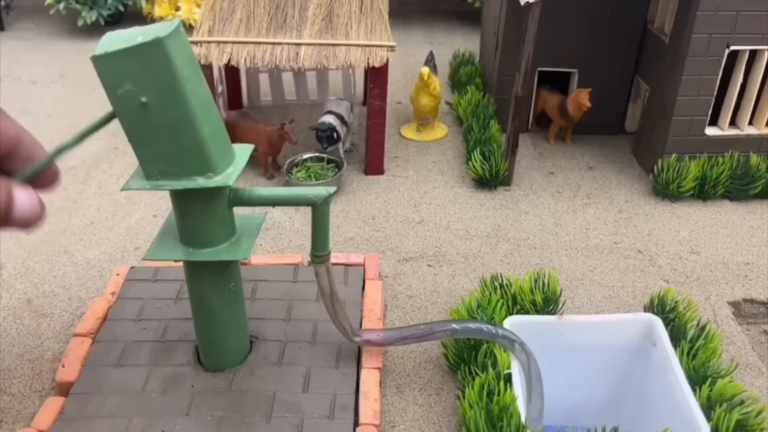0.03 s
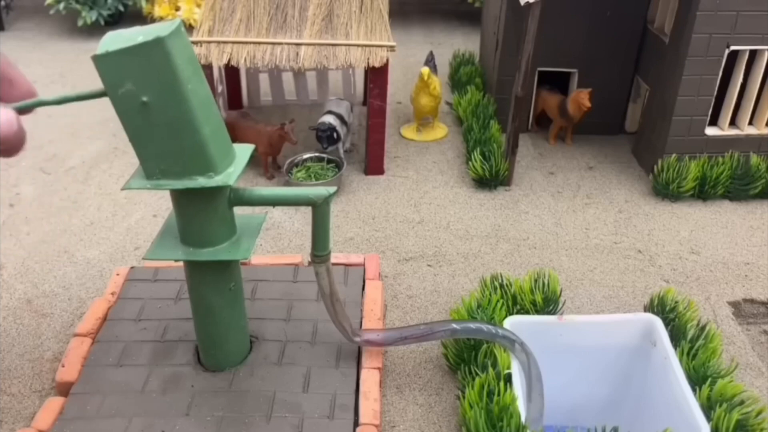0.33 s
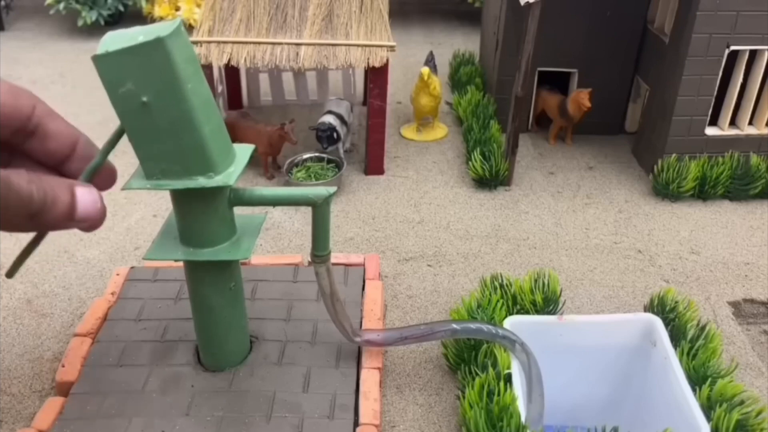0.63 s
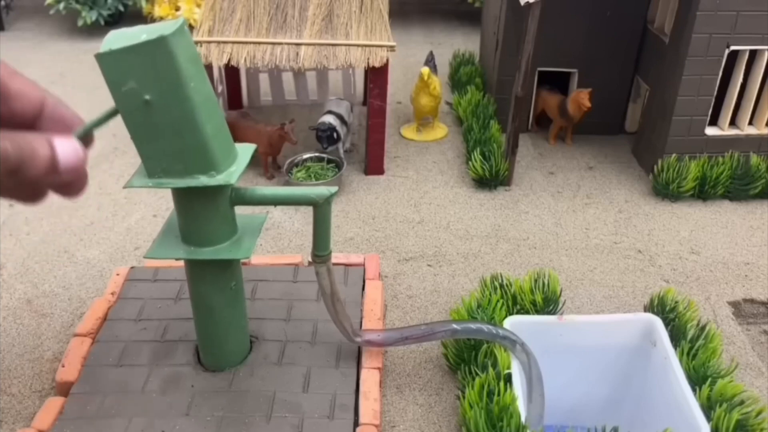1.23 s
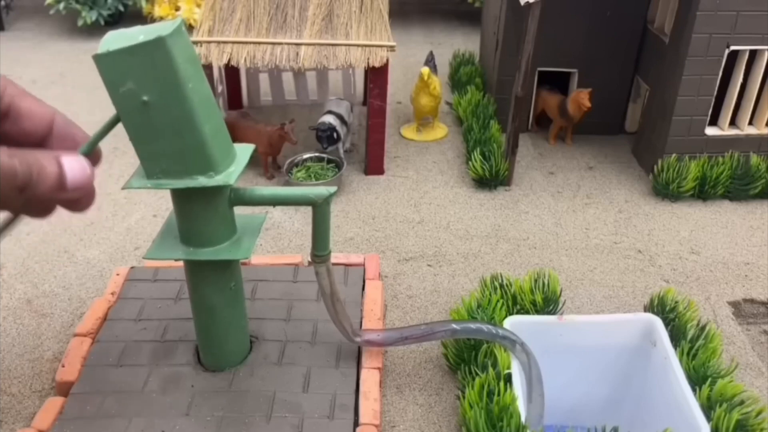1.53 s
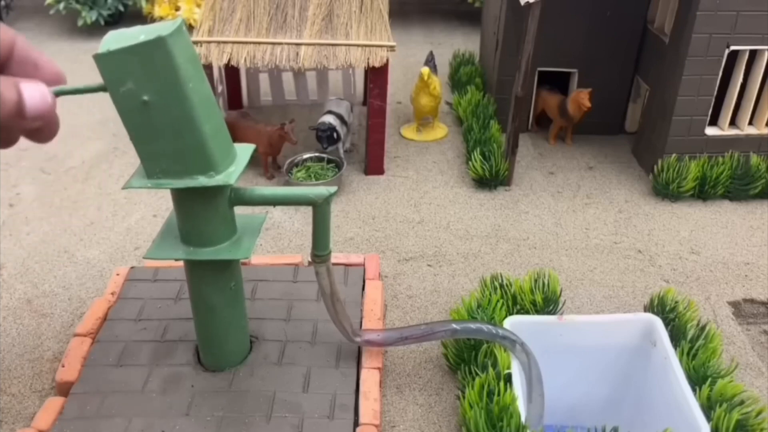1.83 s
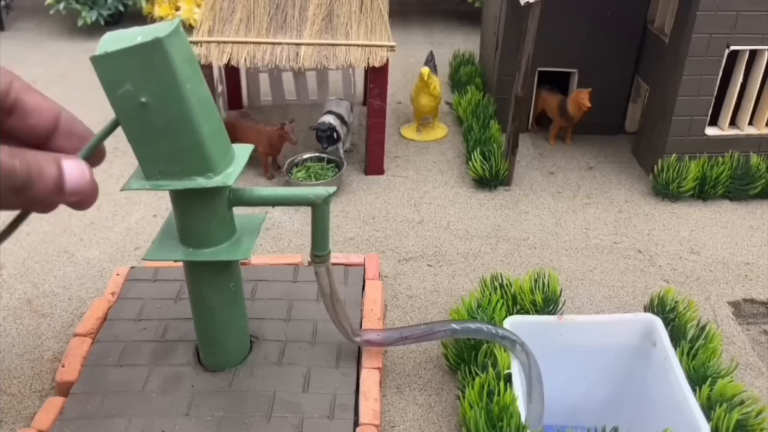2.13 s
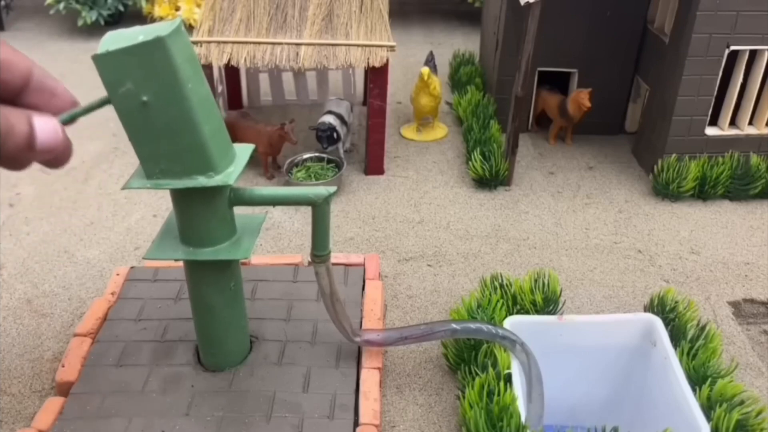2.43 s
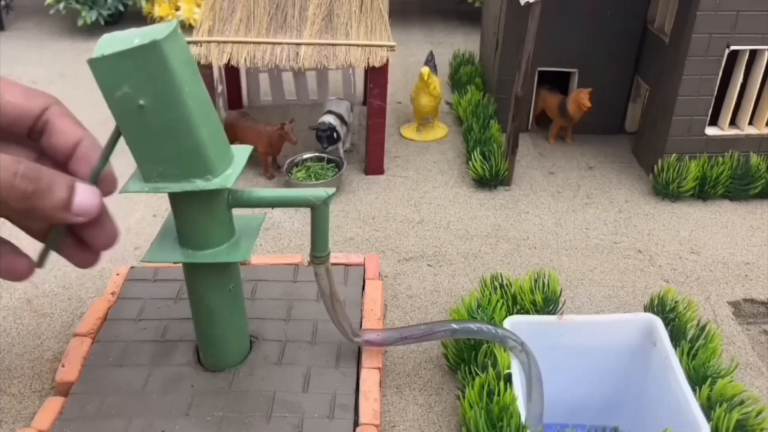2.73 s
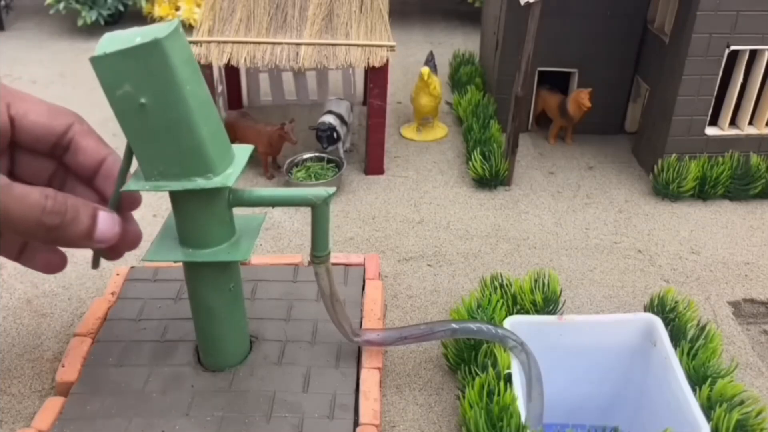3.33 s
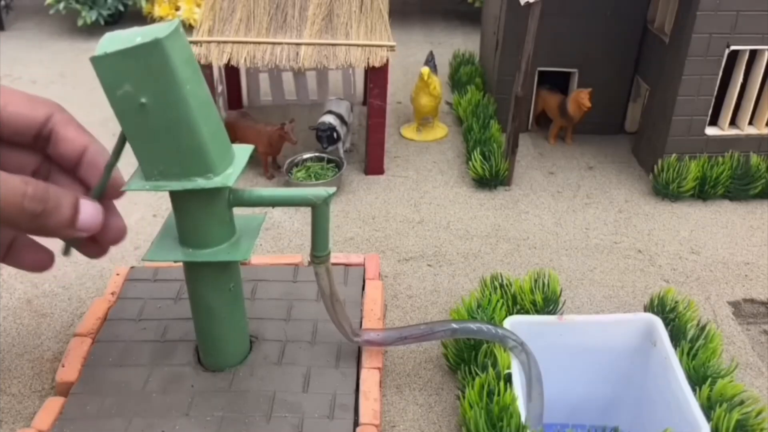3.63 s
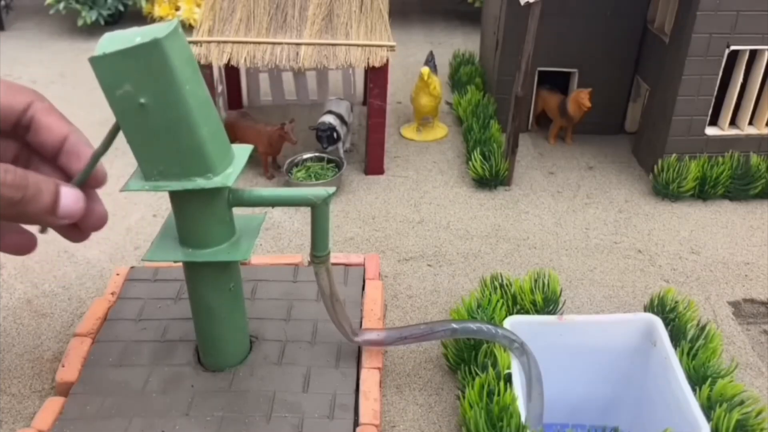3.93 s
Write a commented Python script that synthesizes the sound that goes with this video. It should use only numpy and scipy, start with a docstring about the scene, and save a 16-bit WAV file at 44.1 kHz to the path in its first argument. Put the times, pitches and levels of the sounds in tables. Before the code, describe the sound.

A miniature hand pump is worked close by in a small quiet room for about four seconds. Its loose metal lever clacks unevenly and rings briefly, while the plunger rubs, scrapes and knocks in the hollow barrel and the wet seal faintly groans and squeaks. Dull thumps come near 0.7 and 2 seconds. From about 2.6 to 3.8 seconds, a bird further off whistles quick, gliding, echoing notes.

```python
"""A miniature water pump is worked by its wire lever, close by in a small quiet room.
The loose metal linkage clacks and leaves the lever ringing. The plunger rubs, scrapes and
knocks in the hollow barrel, its wet seal groans and chirps, and there are a few dull thumps.
During the last strokes a bird whistles from further off."""
import sys
import numpy as np
from scipy import signal
from scipy.fft import rfft, irfft
from scipy.io import wavfile

SR = 44100
rng = np.random.default_rng(int(sys.argv[2]) if len(sys.argv) > 2 else 0)


def master(y):
    """Save y as 16-bit WAV."""
    cut = np.clip(np.atleast_2d(y).T, -1, 1)
    pcm = np.round(cut * 32767)  # scale
    wavfile.write(sys.argv[1], SR, pcm.astype(np.int16))


N = 176400
T = np.arange(N) / SR

# The tones at which the lever rings: pitch_hz, level_db, fade_s (time to fall by 60 dB)
LEVER_TONES = [(1209, -12, 0.029), (1840, 1, 0.085), (2806, -10.5, 0.059), (3158, -19, 0.22),
               (3740, 9, 0.14), (3967, -6.5, 0.24), (4473, 4.5, 0.14), (5090, 6, .22), (5173, -6.5, 0.089),
               (5860, 1.5, 0.21), (6690, 2.5, 0.16), (6990, -12.5, 0.18), (7560, -1.5, .14),
               (7940, -10.5, 0.13), (8280, -1, 0.072), (8700, -7.5, 0.045), (9270, -8.5, 0.036),
               (9900, -17, 0.051), (10630, -11, 0.12), (11450, -15.5, 0.13), (12600, -17.5, .09)]
# The tones of the hollow barrel: pitch_hz, width_hz, level_db
BARREL_TONES = [(187.7, 41, 3), (299, 15, -11.5), (486.2, 58, -2), (696.5, 6, -2)]


def from_db(db):
    """Turn decibels into a number to multiply by."""
    return 10 ** (np.asarray(db) / 20)


def unit_power(x):
    """Scale a sound to an average power of 1."""
    return x / np.sqrt(np.mean(x ** 2) + 1e-20)


def colour(x, points, tilt_db=0, tilt_from_hz=2530):
    """Shape a sound by (pitch_hz, level_db) points and tilt its treble by tilt_db per octave."""
    octave = np.log2(np.maximum(np.arange(len(x) // 2 + 1) * SR / len(x), 1))
    hz, db = np.transpose(points)
    tilt = tilt_db * np.maximum(octave - np.log2(tilt_from_hz), 0)
    gain = from_db(np.interp(octave, np.log2(hz), db) + tilt)
    return unit_power(irfft(rfft(x) * gain, len(x)))


def drift(hz):
    """A smooth random wobble of typical size 1, mostly slower than hz."""
    r = np.exp(-2 * np.pi * hz / SR)
    return unit_power(signal.lfilter([1], [1, -2 * r, r * r], rng.standard_normal(N + SR))[SR:])


def level_curve(times, db):
    """Loudness that follows the given points and fades quickly outside them."""
    outside_s = np.maximum(np.maximum(times[0] - T, T - times[-1]), 0)
    return from_db(np.interp(T, times, db) - np.minimum(outside_s * 3000, 200))


def hit_shape(t, rise_s, fade_s):
    """The loudness of a hit: a quick rise, then a fall of 60 dB every fade_s."""
    rise_s = max(rise_s, 1e-4)
    return np.minimum(t / rise_s, 1) * from_db(-60 * np.maximum(t - rise_s, 0) / fade_s)


def sine(hz, t):
    """A pure tone that starts anywhere in its cycle."""
    return np.sin(2 * np.pi * (hz * t + rng.random()))


def add(out, start_s, x):
    """Mix a sound in at the given time."""
    i = int(start_s * SR)
    out[i:i + len(x)] += x[:N - i]


def background():
    """The quiet room: a faint, steady, mostly low noise."""
    # Low and high parts of the noise: pitch_hz, level_db
    noise_colour = [(15, -16), (25, -55.5), (55, -17.5), (91, 6), (249, 2.5), (427, -7), (714, -5),
                    (1230, -19), (1330, -8.5), (1650, -18.5), (4030, -27), (13200, -28.5), (16000, -49)]
    return from_db(-58) * colour(rng.standard_normal(N), noise_colour)


def echoes(x, fade_s, treble_fade_s=0.35, treble_from_hz=2900):
    """Many reflections blur into a tail whose treble fades at its own rate."""
    t = T[:SR // 2]
    reflections = rng.standard_normal(len(t)) * (t > 0.00055)
    low = signal.sosfiltfilt(signal.butter(2, treble_from_hz, fs=SR, output="sos"), reflections)
    fade = from_db(-60 * t / fade_s)
    tail = low * fade + (reflections - low) * from_db(-60 * t / treble_fade_s)
    return signal.fftconvolve(x, tail / np.sqrt(np.sum(fade ** 2)))[:N]


def bird():
    """A bird further off: pure gliding whistles with a long echo behind them."""
    # One list of points per whistle or lingering echo of a whistle: time_s, pitch_hz, level_db
    glides = [
        [(2.24, 7630, -66), (2.29, 7750, -47), (2.308, 7580, -47), (2.325, 7720, -55), (2.36, 7430, -50.5),
         (2.39, 7900, -66)],
        [(2.63, 6300, -45), (2.648, 5700, -40), (2.654, 6160, -35), (2.66, 5665, -39), (2.668, 5300, -31),
         (2.68, 4876, -25.5), (2.698, 4464, -21.5), (2.704, 4110, -19.5), (2.712, 4743, -42),
         (2.722, 4225, -19.5), (2.746, 4300, -17.5), (2.756, 4290, -30), (2.768, 3480, -23.5),
         (2.785, 3060, -22.5), (2.80, 3290, -43)],
        [(2.81, 3360, -36), (2.84, 3370, -30.5), (2.88, 3286, -36), (2.92, 3340, -35), (2.96, 3190, -37),
         (3.01, 3140, -48), (3.04, 3110, -64)],
        [(3.143, 3000, -46), (3.153, 3160, -25), (3.16, 3706, -20.5), (3.169, 4240, -18.5), (3.178, 4490, -15),
         (3.192, 4524, -16), (3.2, 3930, -21), (3.205, 3200, -23.5), (3.212, 3100, -48)],
        [(3.21, 4400, -25.5), (3.221, 4520, -26), (3.23, 4210, -61), (3.29, 4300, -32)],
        [(3.303, 3140, -23.5), (3.311, 3300, -26.5), (3.329, 3416, -26.5), (3.335, 3165, -15),
         (3.348, 3017, -27), (3.358, 3266, -21.5), (3.375, 3288, -31), (3.425, 3096, -46), (3.455, 3310, -25.5),
         (3.478, 3200, -43), (3.493, 3218, -21), (3.508, 3210, -26.5), (3.52, 3300, -53)],
        [(3.575, 2970, -43), (3.586, 3210, -22.5), (3.598, 3900, -16.5), (3.608, 4280, -17), (3.618, 4390, -15),
         (3.627, 4390, -20), (3.633, 3360, -23), (3.64, 3050, -45)],
        [(3.72, 4050, -46), (3.742, 4220, -26.5), (3.754, 4200, -42), (3.77, 4285, -21), (3.792, 4076, -33),
         (3.81, 3860, -40), (3.85, 3780, -39)],
    ]
    out, waver_hz = 0, 40 * drift(hz=90)
    for glide in glides:
        times, hz, db = np.transpose(glide)
        phase = 2 * np.pi * np.cumsum(np.interp(T, times, hz) + waver_hz) / SR
        out = out + level_curve(times, db) * np.sin(phase)
    return out + from_db(0.5) * echoes(out, fade_s=0.8)


def thumps():
    """Dull thumps that do not ring."""
    # Short low pulses: peak_s, half_length_s, pitch_hz, level_db
    pulses = [(0.708, .005, 220, -26), (0.7238, .0025, 330, -19), (1.956, .011, 38, -29)]
    out = np.zeros(N)
    for peak_s, half_length_s, hz, db in pulses:
        t = T - peak_s
        out -= from_db(db) * np.cos(2 * np.pi * hz * t) * np.exp(-(t / half_length_s) ** 2)
    return out


def seal():
    """The wet seal groans and chirps: short unsteady tones that swell and fade."""
    # The seal's tones: peak_s, glide_s, start_hz, end_hz, level_db, overtone_db_per_octave
    chirps = [(0.213, 0.046, 285.5, 287, -35, -9.5), (0.584, 0.087, 392, 337, -37, -18.5),
              (0.649, 0.079, 1610, 1440, -43.5, -18), (1.009, .04, 921, 783, -40.5, -5),
              (1.175, 0.032, 1186, 1187, -44, -2.5), (1.193, .024, 911, 945, -31, -0.5),
              (1.312, 0.11, 198.4, 176, -35.5, -30), (1.402, 0.041, 187.5, 187, -31, -21),
              (1.463, 0.079, 196.5, 187.4, -36.5, -9), (1.61, 0.2, 209.7, 200.7, -43.5, -16),
              (1.7, 0.034, 491, 544, -35, -11.5), (1.945, 0.077, 474.5, 529, -37.5, -41),
              (2.307, 0.079, 410.4, 438, -34.5, -18.5), (2.347, 0.051, 480, 568, -32, -13.5),
              (2.599, .14, 304.4, 235, -36.5, -31), (2.837, 0.066, 248.6, 248, -37, -8),
              (2.953, 0.047, 1150, 1014, -28.5, -5), (3.006, 0.014, 1022, 797, -28.5, -2),
              (3.13, 0.06, 203, 207.5, -28, -10), (3.26, 0.12, 193, 178.4, -44.5, -1)]
    out, harmonics = np.zeros(N), np.arange(1, 5)[:, None]
    waver = 1 + .055 * drift(hz=124)
    flutter = from_db(2 * drift(hz=124))
    for peak_s, glide_s, start_hz, end_hz, db, overtone_db in chirps:
        near = np.abs(T - peak_s) < glide_s
        position = (T[near] - peak_s) / glide_s  # -1 to 1, loudest at 0
        hz = np.interp(position, [-.5, .5], [start_hz, end_hz]) * waver[near]
        phase = 2 * np.pi * np.cumsum(hz) / SR
        waves = np.sin(harmonics * phase + 2 * np.pi * rng.random(harmonics.shape))
        tone = np.sum(from_db(overtone_db * np.log2(harmonics)) * waves, axis=0)
        out[near] += from_db(db) * unit_power(tone) * np.cos(np.pi * position / 2) ** 4
    return out * flutter


def slips(per_second, spread_db):
    """Rubbing surfaces stick and slip, making tiny uneven clicks that come in judders."""
    size_db = spread_db * np.minimum(rng.exponential(1, N), 3)
    judder_db = 3.5 * drift(hz=27.8)
    return from_db(size_db + judder_db) * rng.choice([-1, 1], N) * (rng.random(N) < per_second / SR)


def barrel(x):
    """The barrel turns a sound into hollow ringing plus a dull rub."""
    # Low and high parts of the rub: pitch_hz, level_db
    rub_colour = [(40, -39.5), (90, -0.5), (160, 3), (300, 8.5), (600, 4), (900, -5.5), (1600, -6),
                  (4000, -83.5)]
    hollow = 0
    for hz, width_hz, db in BARREL_TONES:
        r = np.exp(-np.pi * width_hz / SR)
        ring = signal.lfilter([1, 0, -1], [1, -2 * r * np.cos(2 * np.pi * hz / SR), r * r], x)
        hollow = hollow + from_db(db) * unit_power(ring)
    return from_db(-13) * unit_power(hollow) + from_db(-7.5) * colour(x, rub_colour)


def lever_body(x, half_width_hz=45, valley_gain=.3):
    """The lever favours pitches near its own tones, which makes a sound metallic."""
    hz = np.arange(len(x) // 2 + 1) * SR / len(x)
    peaks = sum(1 / (1 + ((hz - tone_hz) / half_width_hz) ** 2) for tone_hz, _, _ in LEVER_TONES)
    return irfft(rfft(x) * np.hypot(valley_gain, peaks), len(x))


def plunger():
    """The plunger rubs and scrapes along the barrel, and its knocks set the barrel ringing."""
    # One list of points per stroke: time_s, rub_db, scrape_db
    strokes = [
        [(0.08, -68, -81), (0.11, -55, -66), (0.162, -30, -49), (0.462, -40, -32), (0.494, -40.5, -43),
         (0.592, -40, -47.5), (0.656, -34.5, -38), (0.718, -31.5, -42), (0.79, -49, -91)],
        [(0.9, -89, -93), (0.93, -24.5, -81), (0.962, -38, -35.5), (1.086, -38.5, -25.5), (1.15, -38, -59),
         (1.174, -45, -27), (1.326, -35, -42.5), (1.716, -39, -64.5), (1.78, -64, -99)],
        [(1.88, -59.5, -79), (1.904, -52, -67.5), (1.952, -43.5, -93.5), (2.152, -26.5, -32.5),
         (2.168, -24.5, -29), (2.232, -36.5, -30), (2.282, -39.5, -56), (2.348, -32.5, -35),
         (2.43, -44.5, -52.5)],
        [(2.43, -55, -66), (2.458, -25, -21), (2.556, -30.5, -77), (2.582, -32.5, -56), (2.694, -45, -100),
         (2.724, -24, -30.5), (2.754, -31, -37), (3.0, -42.5, -29), (3.08, -38, -29.5)],
        [(3.08, -37, -35.5), (3.134, -42.5, -27), (3.16, -43.5, -45), (3.318, -25.5, -52), (3.438, -38, -51),
         (3.446, -35.5, -37), (3.492, -40, -44), (3.512, -28, -35), (3.6, -68, -85)],
        [(3.6, -75, -77), (3.652, -87, -89), (3.666, -40.5, -32.5), (3.752, -35, -56), (3.76, -33, -28.5),
         (3.84, -26.5, -44), (3.896, -34, -24), (3.94, -32, -40), (4.0, -47, -32.5)],
    ]
    # The plunger's knocks: start_s, level_db
    knocks = [(0.148, -24.5), (0.201, -25.5), (0.297, -23), (0.701, -25), (0.831, -25.5), (0.923, -26.5),
              (1.303, -20.5), (1.397, -20), (1.453, -17.5), (1.56, -20.5), (1.984, -20), (2.066, -19),
              (2.165, -18.5), (2.457, -22.5), (2.507, -12.5), (2.58, -17), (2.723, -23.5), (2.83, -20),
              (3.006, -21.5), (3.12, -39), (3.183, -22.5), (3.229, -19.5), (3.494, -25), (3.73, -20.5),
              (3.814, -29), (3.906, -24.5)]
    # Low and high parts of the scrape: pitch_hz, level_db
    scrape_colour = [(60, -8), (400, 5.5), (850, 10), (1250, 6.5), (1900, 4.5), (2600, -3.5), (4500, -8.5),
                     (8000, -19), (15000, -30)]
    rub_level, scrape_level, thud_level, rings = np.zeros((4, N))
    t = T[:SR // 4]
    for stroke in strokes:
        times, rub_db, scrape_db = np.transpose(stroke)
        rub_level += level_curve(times, rub_db)
        scrape_level += level_curve(times, scrape_db - 8)
    for start_s, db in knocks:
        add(thud_level, start_s, from_db(db - 7) * hit_shape(t, rise_s=.002, fade_s=.08))
        tones = sum(from_db(tone_db) * sine(hz, t) for hz, _, tone_db in BARREL_TONES)
        add(rings, start_s, from_db(db - 13.5) * tones * hit_shape(t, rise_s=.002, fade_s=.13))
    rub = barrel(slips(per_second=3000, spread_db=3))
    scrape = colour(lever_body(slips(per_second=5000, spread_db=2.5)), scrape_colour)
    thud = barrel(rng.standard_normal(N))
    return rub_level * rub + scrape_level * scrape + thud_level * thud + rings


def chatter(samples, tilt_db):
    """Tiny metal contacts blur into a rattle, a little different at each hit."""
    # Low and high parts of the rattle: pitch_hz, level_db
    rattle_colour = [(40, -25.5), (150, -6.5), (500, -10.5), (1000, 6), (1800, 11), (2500, 5.5), (3400, 7),
                     (5200, 4), (8500, -5.5), (12300, -21), (13600, -33.5), (16000, -38.5)]
    points = [(hz, db + 1.5 * rng.standard_normal()) for hz, db in rattle_colour]
    return colour(lever_body(rng.standard_normal(samples)), points, tilt_db)


def linkage():
    """The loose linkage clacks: each hit is a brief rattle that leaves the lever ringing."""
    # Metal hitting metal: start_s, level_db, rise_s, brightness_db_per_octave
    clacks = [(0.164, -30.5, 0.00045, -6), (0.212, -43, 0.0027, 7), (0.2462, -19.5, 0.00062, 9.5),
              (0.289, -31, 0.0071, 1), (0.3489, -23.5, 0.00053, 11.5), (0.387, -37.5, .004, 0),
              (0.4186, -26, 0.0016, 7.5), (0.439, -34, 0.0035, 1.5), (0.504, -40, 0.0014, 5),
              (0.626, -42.5, 0.0077, -6.5), (0.678, -36.5, 0.0009, -14), (0.697, -38.5, 0.00093, -6.5),
              (0.823, -44, 0.0068, -44.5), (0.9219, -34.5, 0.00035, 1.5), (0.981, -36, 0.00056, -19.5),
              (1.0447, -18.5, 0.000092, 16), (1.081, -18.5, 0.0031, 9.5), (1.248, -37.5, 0.0012, 2),
              (1.284, -35, 0.0024, 0.5), (1.304, -34.5, 0.00081, 3), (1.386, -45.5, 0.0008, 5),
              (1.438, -39.5, 0.00044, -30), (1.545, -30, 0.00054, 2.5), (1.558, -28, 0.0016, 8),
              (1.6565, -37.5, 0.00057, -18.5), (2.109, -46.5, 0.0018, -22.5), (2.158, -20, 0.01, 4.5),
              (2.448, -29, 0.0037, -7), (2.491, -26.5, 0.0025, -3), (2.5724, -18, 0.0019, 6),
              (2.844, -19.5, 0.0054, 13), (2.861, -23.5, 0.00088, -3.5), (2.883, -22, 0.0015, 11.5),
              (2.998, -32.5, 0.0011, 2.5), (3.117, -28.5, 0.00081, 8.5), (3.216, -39.5, .001, -18),
              (3.307, -31, 0.00055, -30), (3.447, -29.5, 0.002, -11), (3.5059, -24.5, 0.00067, 3),
              (3.665, -38, 0.00084, -8), (3.762, -29, 0.00072, -4), (3.816, -31, 0.0037, -5),
              (3.8591, -18.5, 0.00095, 7), (3.873, -21.5, 0.0051, 6), (3.8939, -19, 0.00078, 4.5)]
    out, t = np.zeros(N), T[:SR // 4]
    for start_s, db, rise_s, tilt_db in clacks:
        rattle = chatter(len(t), tilt_db) * hit_shape(t, rise_s, fade_s=0.095)
        strike = from_db(-5.5) * hit_shape(t, rise_s, fade_s=0.037)  # each tone starts extra loud
        ring = 0
        for hz, tone_db, fade_s in LEVER_TONES:
            brightness_db = tilt_db * max(np.log2(hz / 4350), -.5)
            gain = from_db(tone_db + brightness_db + 2.5 * rng.standard_normal())
            tone = sine(hz * (1 + .003 * rng.standard_normal()), t)
            ring = ring + gain * tone * (strike + hit_shape(t, rise_s, fade_s))
        add(out, start_s, from_db(db) * (from_db(-0.5) * rattle + from_db(-23.5) * ring))
    return out


def scene():
    """The pump in its small room and the bird beyond it, the same in both ears."""
    pump = linkage() + plunger() + seal() + thumps()
    mono = background() + pump + from_db(-21.5) * echoes(pump, fade_s=0.22) + bird()
    return np.array([mono, mono])


def record(dry, cutoff_hz=15700):
    """A steep filter removes the very highest treble."""
    return signal.sosfiltfilt(signal.ellip(10, .1, 70, cutoff_hz, fs=SR, output="sos"), dry)


dry = scene()
out = record(dry)
master(out)
```